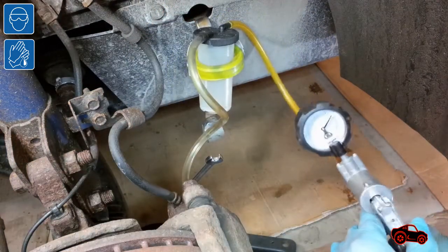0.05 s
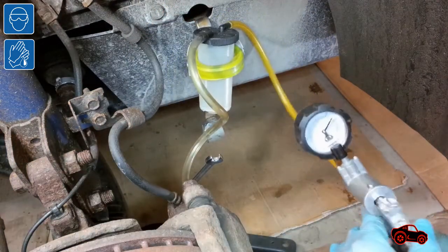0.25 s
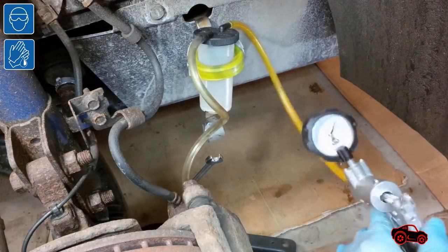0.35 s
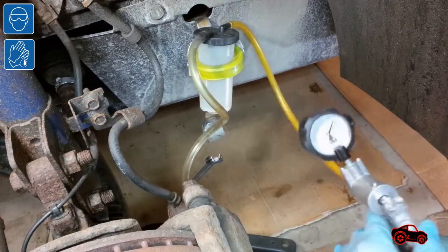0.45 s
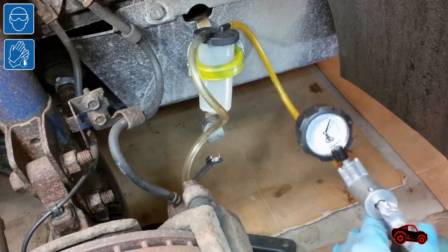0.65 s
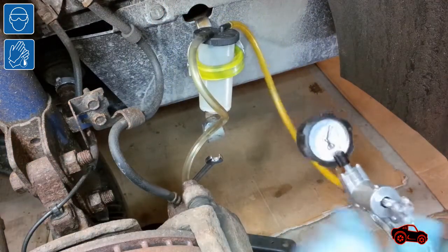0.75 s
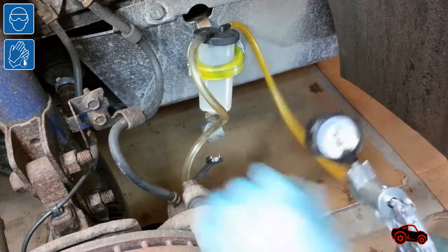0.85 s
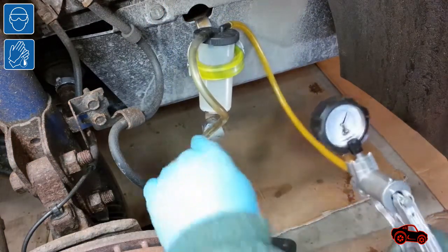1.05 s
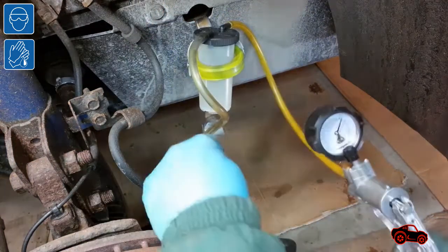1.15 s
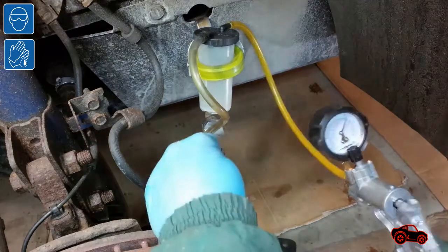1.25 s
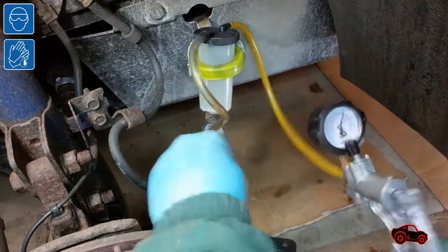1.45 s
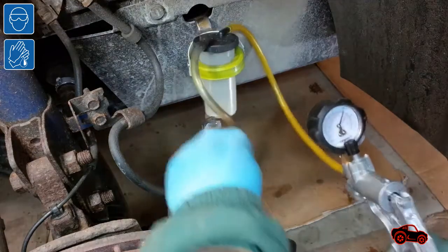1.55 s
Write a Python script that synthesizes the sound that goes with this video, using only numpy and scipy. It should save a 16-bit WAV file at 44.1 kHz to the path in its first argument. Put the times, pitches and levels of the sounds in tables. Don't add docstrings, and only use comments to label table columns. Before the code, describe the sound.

Close stereo pickup of a hand-held pump in a garage: three quick knock-and-hiss strokes, the last hiss shorter and weaker, with slight sucking handle returns, seal squeaks, glove rustle and small ticks over quiet hum.

```python
import sys
import numpy as np
from scipy import signal
from scipy.fft import rfft, irfft
from scipy.io import wavfile
from scipy.ndimage import uniform_filter1d

SR = 44100
rng = np.random.default_rng(int(sys.argv[2]) if len(sys.argv) > 2 else 0)


def ratio_of_db(decibels):
    return 10 ** (np.asarray(decibels, float) / 20)


def dump_mix(stems):
    frames = np.atleast_2d(stems).T
    limited = np.clip(frames, -1, 1)
    pcm = np.round(limited * 32767).astype(np.int16)
    wavfile.write(sys.argv[1], SR, pcm)


N = 70560


def evened(x):
    return x / np.sqrt(np.mean(x ** 2) + 1e-20)


def read(points, hz):
    f, value = np.transpose(points)
    return np.interp(np.log(hz + 1), np.log(f + 1), value)


def add(mix, start_s, sound):
    part = mix[:, max(round(start_s * SR), 0):][:, :sound.shape[1]]
    part += sound[:, :part.shape[1]]


def pair(size, same, pan_db):
    left, other = rng.standard_normal((size, 2)).T
    same = np.clip(same, 0, 1)
    right = same * left + np.sqrt(1 - same ** 2) * other
    return np.array([left, right]) * ratio_of_db(np.array([[pan_db / 2], [-pan_db / 2]]))


def ring(x, hz, width_hz):
    b, a = signal.iirpeak(min(hz, SR / 2.2), hz / width_hz, SR)
    return signal.lfilter(b, a, x) / np.sqrt(np.pi * width_hz / SR)


def coloured(x, db):
    size = x.shape[-1]
    return irfft(rfft(x) * ratio_of_db(db(np.fft.rfftfreq(size, 1 / SR))), size)


def flutter(size, hz):
    noise = uniform_filter1d(rng.standard_normal(size), 40)
    return evened(signal.lfilter([1], [1, -np.exp(-2 * np.pi * hz / SR)], noise))


def hump(t, length_s, rise):
    u = np.clip(t / length_s, 0, 1)
    return np.minimum(u / rise, 1) * np.cos(np.pi / 2 * u) ** 0.79


KNOCK_TIMES = [
    .1664,
    .638,
    1.0514,
]
KNOCK_LEVELS = [
    -31.5,
    -28,
    -30.5,
]
# pitch_hz, level_db, fade_60db_s
BODY_NOTES = [(98.749, -15.5, 0.072), (243.2, -19.5, 0.19), (267.8, 0, 0.13), (454, -2.5, 0.028),
              (486, 1, 0.061), (659, 10, 0.012), (812, 0.5, 0.032), (892, -7.5, 0.03037),
              (1490, -16, 0.033)]
# pitch_hz, level_db
RATTLE_TONE = [(50, -18), (100, -0.5), (170, -8), (260, -5), (480, -7), (900, -16), (1500, -16.5),
               (4000, -42.5)]


def knock(db):
    t = np.arange(0, .25, 1 / SR)
    body = 0
    for hz, level_db, t60_s in BODY_NOTES:
        body = body - ratio_of_db(level_db - 60 * t / t60_s) * np.sin(2 * np.pi * hz * t)
    body = body * (1 - np.exp(-t / 0.0004867))
    body = body / abs(body).max() * ratio_of_db(np.array([[1.4], [-1.4]]))
    rattle = evened(coloured(pair(len(t), 0.91, 1.64), lambda hz: read(RATTLE_TONE, hz)))
    rattle = rattle * np.minimum(t / 0.002, 1)
    return ratio_of_db(db) * (body + rattle * ratio_of_db(-20 - 60 * t / 0.45))


# time_s, level_db
AIR_FLOW = [
    [(.17, -96), (.216, -36.5), (.238, -29), (.342, -36.5), (.386, -52), (.428, -82.5), (.436, -68),
     (.47, -95.5)],
    [(.64, -87), (.662, -48), (.68, -33.5), (.73, -30.5), (.786, -37.5), (.844, -70), (.856, -61.5),
     (.9, -98)],
    [(1.055, -67), (1.065, -55.5), (1.079, -45.5), (1.105, -39), (1.172, -41.5), (1.18, -44.5),
     (1.21, -55.5), (1.24, -66)],
]
STROKE_PITCH = [
    (1.001, 1.001),
    (1.002, 1.001),
    (1.019, .99),
]
# tube_db, middle_db, high_db, jet_db, left_right_db
STROKE_BALANCE = [
    (0, 4.5, 2.5, 9, 1.5),
    (0, 3, 1, 7, 1.5),
    (3, 0, -3.5, 16.5, 3),
]
# pitch_hz, width_hz, level_db, left_right_db
VALVE_RINGS = [(1915, 60.12, -12, 10), (1835, 120, -12.5, 4.5), (2170, 392.16, -14, -1),
               (3313, 500, -18, -2), (4346, 260, -21.5, -1.5), (5267, 100, -11, 0), (5191, 222.3, -12, 3),
               (5540, 785, -13.5, 2), (10500, 94, -11, -7), (10590, 63, -6.5, -1.5),
               (10500, 410, -2.5, 1.5), (11065, 650, -1, -3), (13604, 280, -4, 0.5),
               (13240, 440, -11.5, 14), (14500, 500, -13.5, 3), (15550, 200, -20.5, 2.5)]
# pitch_hz, level_db
JET_TONE = [(300, -46.5), (1500, -31.5), (4000, -58), (7600, -43), (9000, -32.5), (12300, -25.5),
            (13500, -15), (15500, -26.5)]
# pitch_hz, likeness_0_to_1
NEAR_LIKENESS = [(1900, .98), (5000, .95), (10500, .96), (14000, .85)]


def vent(curve, tune, tube_db, middle_db, high_db, jet_db, pan_db):
    time_s, level_db = np.transpose(curve)
    t = np.arange(time_s[0], time_s[-1], 1 / SR)
    size = len(t)
    flow_db = np.interp(t, time_s, level_db)
    under_db = np.maximum(flow_db - level_db.max(), -30) * (t > time_s[level_db.argmax()])
    tube_growth, broad_growth, high_growth = -0.11, 0.062, 0.22
    jet = coloured(pair(size, 1.0, -2.5 + pan_db), lambda hz: read(JET_TONE, hz) + 9 + jet_db)
    air = jet * ratio_of_db(broad_growth * under_db)
    for hz, width_hz, ring_db, ring_pan_db in VALVE_RINGS:
        band = int(hz > 3800) + int(hz > 8000)
        hz = hz * (*tune, 1)[band]
        growth = tube_growth * (band == 0) + high_growth * (hz > 11000)
        growth = growth + broad_growth * (width_hz > 380)
        noise = pair(size, read(NEAR_LIKENESS, hz), ring_pan_db + pan_db)
        tone = ring(ring(noise, hz, 2.68 * width_hz), hz, width_hz)
        tone = tone * np.sqrt(np.pi * 3.6 * width_hz / SR)
        tone_db = ring_db + (tube_db, middle_db, high_db)[band] + growth * under_db
        air = air + tone * ratio_of_db(tone_db + 0.85 * flutter(size, 24.5))
    edge = np.clip(np.minimum(t - time_s[0], time_s[-1] - t) / 0.0033, 0, 1)
    return air * edge * ratio_of_db(flow_db - 1.0 - flutter(size, 118.6))


# start_s, length_s, level_db, brightness_db, rise_share_0_to_1
HANDLE_RETURNS = [
    (.003, 0.06, -80.5, 16.5, .15),
    (0.046, 0.048, -62.5, 5.5, .45),
    (0.518, 0.043, -61, 5, .05),
    (0.577, 0.02123, -71.5, -20, .05),
    (0.605, 0.062, -70.5, -14, .05),
    (0.838, 0.038, -69, 9.5, .05),
]
# pitch_hz, width_hz, level_db
INLET_RINGS = [(2050, 150, -4), (2380, 150, -8.5), (2831, 100, -7.5), (3955, 290, -8), (6300, 400, -18),
               (9200, 510, -28), (10230, 430, -4.5), (12600, 4400, -9)]


def suck(length_s, db, bright_db, rise):
    t = np.arange(0, length_s, 1 / SR)
    air = 0
    for hz, width_hz, ring_db in INLET_RINGS:
        level_db = ring_db + bright_db * (hz > 5000) + 3.653 * flutter(len(t), 36)
        air = air + ratio_of_db(level_db) * ring(pair(len(t), 0.91, 0.83), hz, width_hz)
    return air * hump(t, length_s, rise) * ratio_of_db(db + 1.9 * flutter(len(t), 150))


# start_s, length_s, level_db, from_hz, to_hz
SEAL_SQUEAKS = [(.06, 0.055, -61.5, 2008, 2095), (.116, 0.03, -60, 2135, 2064),
                (.118, 0.024, -67.5, 3900, 4130), (.012, 0.044, -73.5, 3150, 3045),
                (.135, .03, -68.5, 2800, 2713), (.93, 0.042, -96, 2080, 1980),
                (.522, 0.071, -65, 2140, 1910), (.581, 0.01684, -58.5, 2050, 1933),
                (.605, 0.028, -76.5, 2290, 2136), (.962, 0.052, -69, 2620, 2660),
                (1.003, 0.047, -63, 3800, 4170), (1.01, 0.038, -64, 3250, 3410),
                (1.49, 0.04, -65.5, 1660, 1670)]


def squeak(length_s, db, from_hz, to_hz):
    t = np.arange(0, length_s, 1 / SR)
    settle = 400
    r = np.exp(-np.pi * 200 / SR)
    fuzz = pair(len(t) + settle, 0.73, 2.9) + 1j * pair(len(t) + settle, 1.0, 0.87)
    for _ in range(2):
        fuzz = signal.lfilter([1 - r], [1, -r], fuzz)
    turns = np.cumsum(from_hz + (to_hz - from_hz) * t / length_s) / SR
    tone = (fuzz[:, settle:] * np.exp(2j * np.pi * turns)).real
    return ratio_of_db(db) * evened(tone) * hump(t, length_s, 0.25)


def grainy(size):
    grains_per_s, spread_db = 860, 1
    sizes = ratio_of_db(spread_db * np.minimum(rng.exponential(1, size), 4))
    hits = (rng.random(size) < grains_per_s / SR) * sizes
    return evened(2.7 + signal.lfilter([1], [1, -.99], hits))


# start_s, length_s, level_db, from_hz, to_hz
GLOVE_RUSTLES = [(0.896, 0.2, -69.5, 1660, 2100), (.985, 0.16, -61.5, 2300, 1800),
                 (0.93, 0.11, -76, 4200, 4550), (0.986, 0.16, -67, 5500, 5400),
                 (1.04, 0.22, -53.5, 4700, 5600), (1.198, 0.051, -51, 9800, 11300),
                 (1.24, 0.089, -55.5, 15000, 18000), (1.229, 0.16, -60, 20000, 26000),
                 (1.045, 0.35, -65.5, 660, 1400), (1.175, 0.23, -64.5, 2821, 1500),
                 (1.463, 0.088, -69.5, 1760, 1700), (1.527, 0.13, -60.5, 1970, 2100),
                 (1.458, 0.12, -82.5, 11000, 12000)]
# start_s, length_s, level_db, from_hz, to_hz
FINGER_SCRAPES = [(1.07, 0.15, -49.5, 4540, 6000), (0.95, 0.13, -58, 3040, 3100),
                  (1.347, 0.037, -65, 1700, 1804), (1.475, 0.054, -68, 2700, 2698),
                  (1.542, 0.03944, -71, 2900, 3959), (1.541, 0.082, -74, 5830, 5897),
                  (1.558, 0.04876, -64, 1512, 1300), (1.564, 0.036, -67, 3300, 3360),
                  (1.258, 0.064, -61, 13400, 14000)]


def rustles():
    frames, hz = N // 64 + 5, np.fft.rfftfreq(256, 1 / SR)[:, None] + 1
    t, power = np.arange(frames) * 64 / SR, 0
    for table, octaves in ((GLOVE_RUSTLES, 0.6), (FINGER_SCRAPES, 0.25)):
        for start_s, length_s, db, from_hz, to_hz in table:
            centre = from_hz * (to_hz / from_hz) ** np.clip((t - start_s) / length_s, 0, 1)
            shape = np.exp(-(np.log2(hz / centre) / octaves) ** 2)
            loudness = ratio_of_db(db) * hump(t - start_s, length_s, 0.22)
            power = power + shape / shape.mean(0) * loudness ** 2
    z = signal.stft(pair(N + 256, 0.98, 0.63), nperseg=256, noverlap=192)[2][:, :, :frames]
    patches = uniform_filter1d(rng.standard_normal((frames, len(hz))).T, size=3, axis=0)
    patches = evened(uniform_filter1d(patches, size=12, axis=1))
    z = z * np.sqrt(power) * ratio_of_db(2.5 * patches)
    x = signal.istft(z, nperseg=256, noverlap=192)[1][:, :N]
    return x * ratio_of_db(-flutter(N, 40)) * grainy(N)


# start_s, level_db, pitch_hz
TAPS = [(.436, -69, 8900), (0.525, -54, 10500), (.542, -54, 11400), (0.567, -74, 11170), (.853, -61, 2896),
        (1.285, -55, 10200), (1.5415, -54, 3470), (.582, -62, 2050), (1.576, -58, 3417), (.105, -76, 4300),
        (1.488, -61, 1620)]


def tick(db, hz):
    t = np.arange(0, .04, 1 / SR)
    strike = 9.9 * (t == 0) + 0.52 * pair(len(t), 0.89, 1.5)
    once = ring(ratio_of_db(db - 60 * t / 0.034) * strike, hz, 0.12386 * hz)
    return ring(once, hz, 0.19 * hz) * np.sqrt(hz / SR)


# start_s, level_db, pitch_hz
SNAPS = [(.521, -62, 9500), (.583, -74, 6000), (.021, -52, 645), (.432, -53, 520), (.852, -53.5, 473),
         (1.541, -71, 6000), (.02, -81, 3000), (.434, -61.5, 3485), (.93, -66, 4500), (1.051, -58, 6000),
         (1.285, -56.5, 9400), (1.4535, -66, 7986), (1.576, -66, 7000)]


def click(db, hz):
    t = np.arange(0, .02, 1 / SR)
    once = ring(ratio_of_db(db - 60 * t / 0.024) * pair(len(t), 1.0, 1.4), hz, 0.76 * hz)
    return ring(once, hz, 1.44 * hz) * np.sqrt(4.9 * hz / SR)


def room(x):
    t = np.arange(round(.3 * SR)) / SR
    signs = rng.choice([-1., 1.], (len(t), 3)).T
    present = rng.random((len(t), 3)).T < .05
    taps = signs * present * ratio_of_db(-60 * t / 0.10809) * (t > .003)
    taps = taps[0] + .6 * taps[1:]
    return signal.fftconvolve(x, taps / np.linalg.norm(taps[0]), axes=1)[:, :N]


# pitch_hz, lead_radians
LEFT_LEAD = [(3000, 0), (8000, -0.32), (10500, -1.2), (14500, -0.9)]


def ports(x):
    turn = np.exp(.5j * read(LEFT_LEAD, np.fft.rfftfreq(N, 1 / SR)))
    return irfft(rfft(x) * np.array([turn, 1 / turn]), N)


# pitch_hz, level_db
GARAGE_TONE = [(18, -1), (35, -2.5), (120, -7.5), (240, -13.5), (350, -7.5), (1000, -18), (3600, -30.5),
               (15500, -41)]
# pitch_hz, likeness_0_to_1
GARAGE_LIKENESS = [(40, .86), (500, .85), (3000, .7), (12000, .5)]


def garage():
    a, b = rng.standard_normal((N, 2)).T
    hz = np.fft.rfftfreq(N, 1 / SR)
    same, left = np.clip(read(GARAGE_LIKENESS, hz), 0, 1), rfft(a)
    right = same * left + np.sqrt(1 - same ** 2) * rfft(b)
    z = np.array([left, right]) * ratio_of_db(read(GARAGE_TONE, hz)) * (hz > 18)
    level = ratio_of_db(-62.5 + 0.87 * flutter(N, 0.9))
    return level * evened(irfft(z, N)) * ratio_of_db(np.array([[.6], [-.6]]))


def scene():
    near, thumps = rustles(), np.zeros((2, N))
    strokes = zip(KNOCK_TIMES, KNOCK_LEVELS, AIR_FLOW, STROKE_PITCH, STROKE_BALANCE)
    for start_s, db, curve, tune, balance in strokes:
        add(thumps, start_s, knock(db))
        add(near, curve[0][0], vent(curve, tune, *balance))
    for table, source in ((HANDLE_RETURNS, suck), (SEAL_SQUEAKS, squeak), (TAPS, tick), (SNAPS, click)):
        for start_s, *settings in table:
            add(near, start_s, source(*settings))
    reflections = room(ratio_of_db(-6) * near + ratio_of_db(-12) * thumps)
    return ports(near + thumps + reflections) + garage()


def band_limit(x):
    return signal.sosfilt(signal.butter(12, 16190, fs=SR, output="sos"), x)


def record(dry):
    duck_from_db, duck_share, recover_db_per_s = -37, 0.27, 33.5
    power_db = 10 * np.log10(abs(uniform_filter1d((dry ** 2).mean(0), 800)) + 1e-12)
    fall_db = np.arange(N) * recover_db_per_s / SR
    held_db = np.maximum.accumulate(power_db + fall_db) - fall_db
    over_db = np.maximum(held_db - duck_from_db, 0)
    x = dry / ratio_of_db(duck_share * uniform_filter1d(over_db, 600))
    low_pass = signal.firwin(511, 15690, window=("kaiser", 9), fs=SR)
    mix = signal.oaconvolve(x, low_pass[None], "same")
    return band_limit(mix)


dry = scene()
out = record(dry)
dump_mix(out)
```